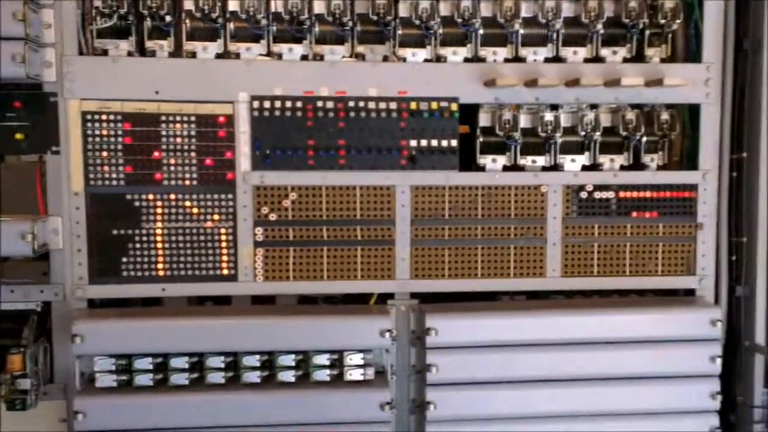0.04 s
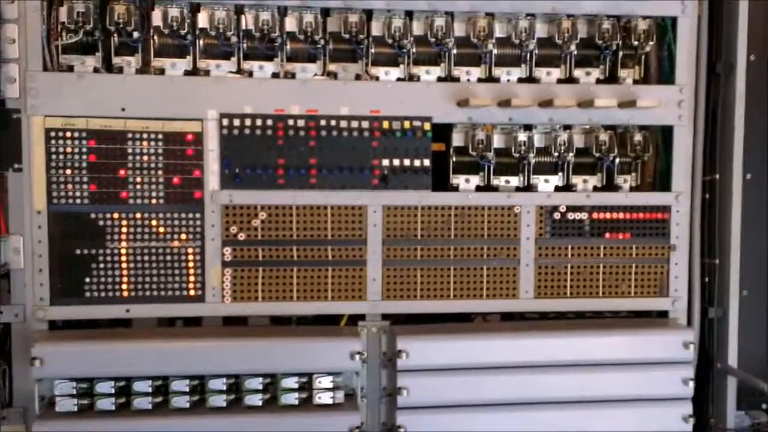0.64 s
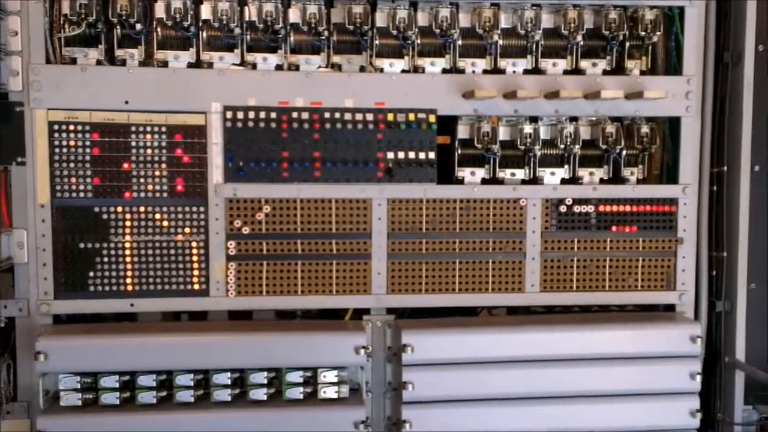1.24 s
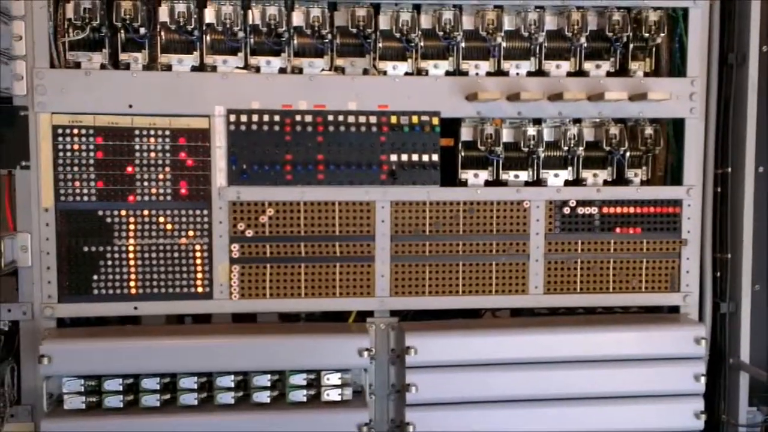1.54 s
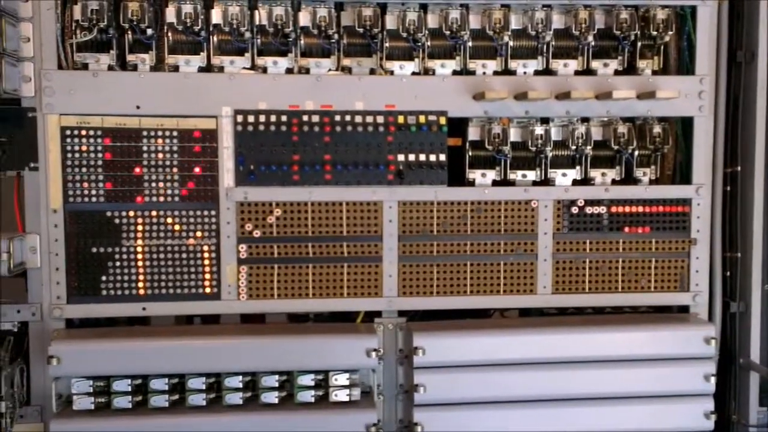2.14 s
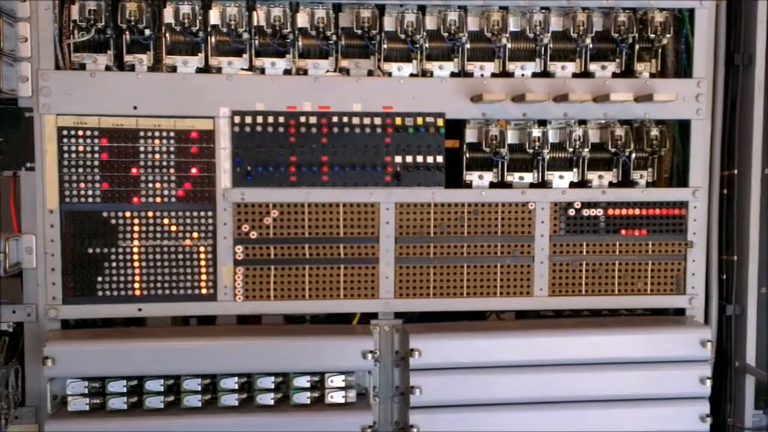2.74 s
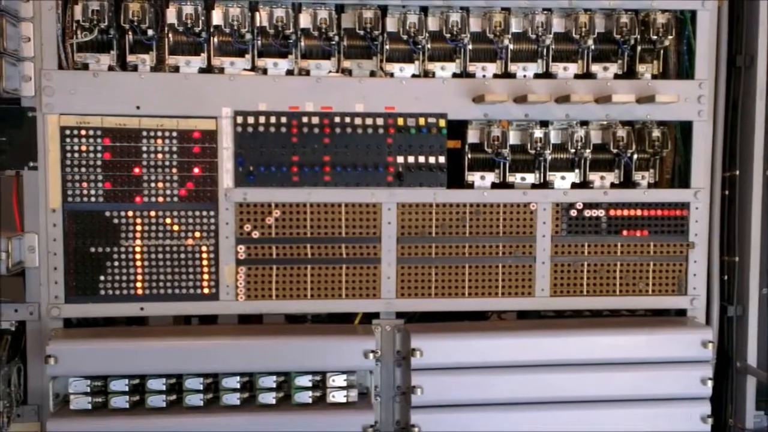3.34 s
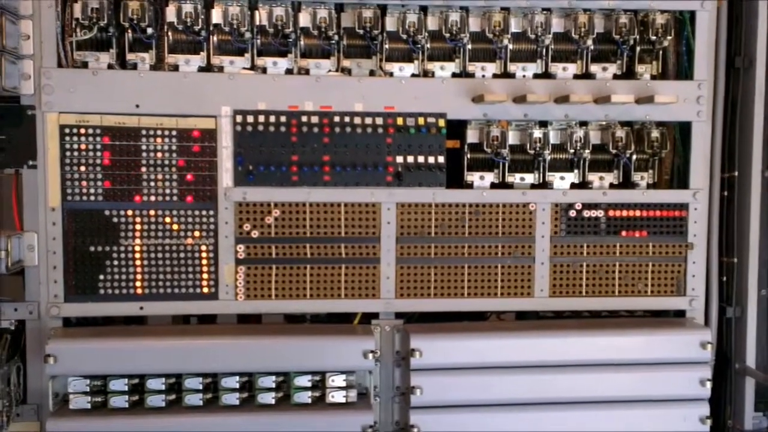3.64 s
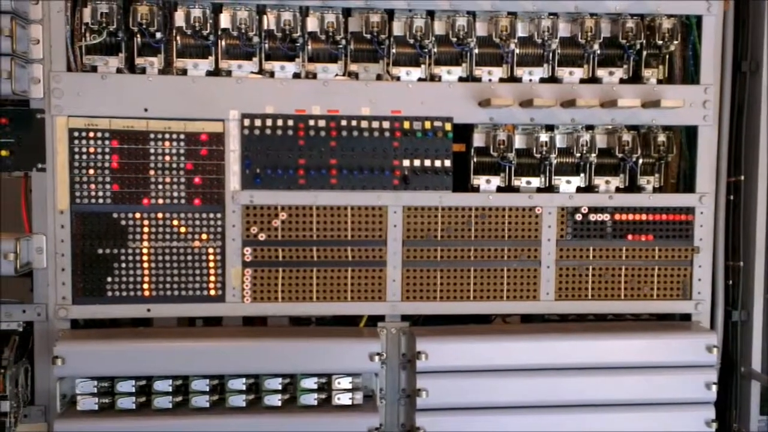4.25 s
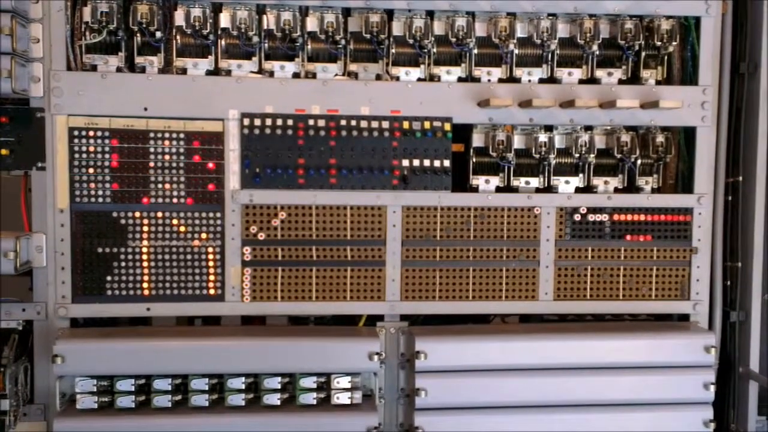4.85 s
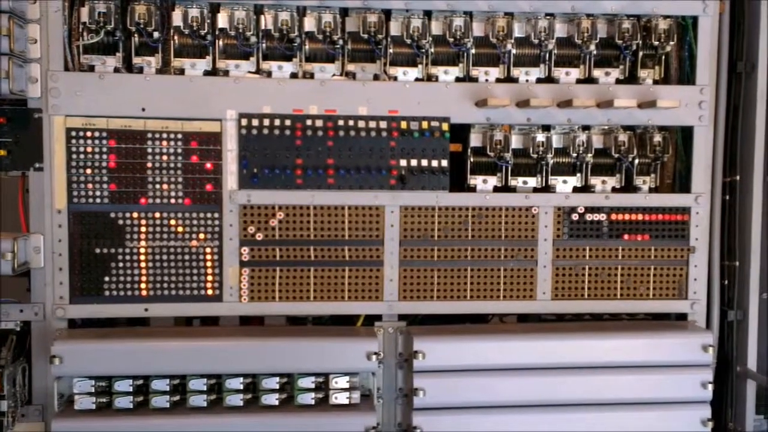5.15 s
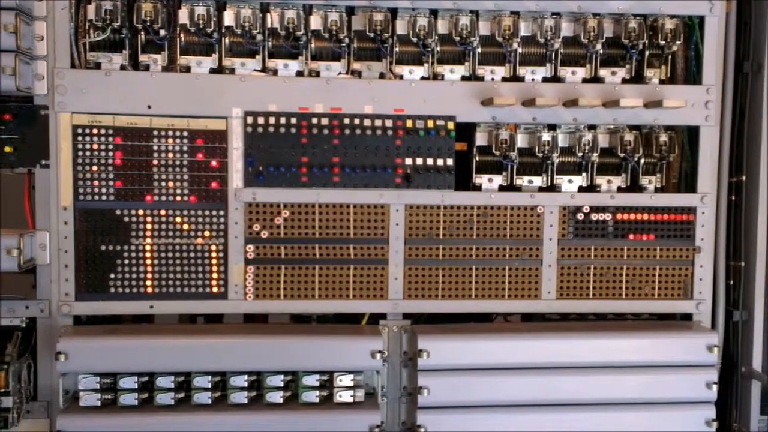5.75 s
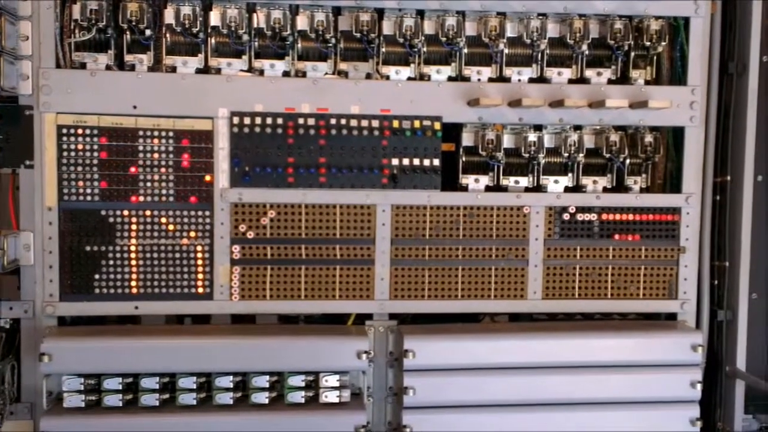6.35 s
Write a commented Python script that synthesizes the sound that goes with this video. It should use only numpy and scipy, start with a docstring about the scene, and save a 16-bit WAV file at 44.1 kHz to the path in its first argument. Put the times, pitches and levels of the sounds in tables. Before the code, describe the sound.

An old electromechanical relay machine runs in a small, hard-walled room, heard from just in front. Its motor and gears whirr and hiss throughout with a faint whine. Five times, evenly spaced, a brief sliding rustle leads into a loud, bright metal clack and a quickly fading clatter of relays. A softer burst of relay clicks comes about half a cycle before each loud stroke.

```python
"""A relay computer's steel latch snaps home once a cycle, amid a clatter of armatures, and rebounds.
A wiper slides ahead of each stroke; half a cycle later a bank of relays switches more softly.
The drive motor whines and its gears and wipers whirr and hiss throughout.
Heard from just in front of the rack, in a hard-walled room."""
import sys
import numpy as np
from scipy import signal
from scipy.fft import rfft, irfft
from scipy.io import wavfile

SR = 44100
rng = np.random.default_rng(int(sys.argv[2]) if len(sys.argv) > 2 else 0)


def inscribe(sig):
    """Save sig as 16-bit PCM at rate SR to the path in sys.argv[1].

    A 1-D sig is mono; a 2-D sig holds one channel per row.
    Samples are clipped to [-1, 1] before scaling.
    """
    pcm = np.round(np.clip(np.atleast_2d(sig).T, -1, 1) * 32767)
    wavfile.write(sys.argv[1], SR, pcm.astype(np.int16))


N = 286650
TIME = np.arange(N) / SR
HZ = np.maximum(np.fft.rfftfreq(N, 1 / SR), 1)
BANK_LEAD_S = .6212  # soft bank ahead of the main stroke
SNAP_RISE_S = .03  # 60 dB rise of the abrupt volleys
LIGHT_CHATTER_S = .0021

# machine cycles: main stroke t/s, armature force/dB, latch blow/dB, latch bounce/dB,
# soft-bank spring snap/dB, rebound delay/s
CYCLES = [(0.7881, 1.5, -5, -6.5, -21, 0.065), (2.1471, 2.5, -6.5, -8, -36, 0.053),
          (3.5066, 2, -5.5, -8.5, -23, 0.07), (4.8646, 2.5, -7, -17, -24, .0695),
          (6.2232, 2, -7, -9.5, -27, 0.058)]
# armature groups: delay/s, level/dB, 60 dB rise/s, 60 dB fall/s, tilt/(dB/oct), spring ring/dB
# rows: soft bank, its slower relays, pull-in, main clatter, rebound, release
VOLLEYS = [(-0.620, -23.5, SNAP_RISE_S, 0.51, 2.4, 7), (-0.597, -31.5, SNAP_RISE_S, 1.0, -.5, 0.5),
           (-0.0047, -21, 0.19, 0.15, 2.4, 0.5), (0.009, -18.5, SNAP_RISE_S, 0.5338, 0.35, 2),
           (0.0677, -22.5, 0.13, 0.4042, 0, 7.5), (0.198, -30, .13, 0.26, -0.5, 3.5)]
# stereo balance of the rack: f/Hz, left-right/dB
RACK_BALANCE = [(700, 0.5), (1300, 3.5), (2400, 1), (4400, -3.5), (6800, -6.5), (9300, 7), (15000, 2.5)]


def from_db(db):
    """Amplitude ratio."""
    return 10 ** (np.asarray(db) / 20)


def unit_rms(x):
    """Scale to rms 1."""
    return x / np.sqrt(np.mean(x ** 2) + 1e-20)


def at_hz(points):
    """Table interpolated over log frequency."""
    hz, value = np.transpose(points)
    return np.interp(np.log(HZ), np.log(hz), value)


def pan(db):
    """Constant-power left and right gains."""
    gains = from_db(np.array([[1], [-1]]) * db / 2)
    return gains / np.sqrt(np.mean(gains ** 2, axis=0))


def colour(x, db):
    """Shape a white signal, keeping its power."""
    return irfft(rfft(x) * unit_rms(from_db(db)), N)


def drift(corner_hz):
    """Slow random variation, rms 1."""
    return unit_rms(irfft(rfft(rng.standard_normal(N)) / (1 + (HZ / corner_hz) ** 2), N))


def resonate(x, hz, width_hz):
    """One resonance, peak gain 1."""
    r = np.exp(-np.pi * width_hz / SR)
    feedback = [1, -2 * r * np.cos(2 * np.pi * hz / SR), r * r]
    return signal.lfilter(np.array([1, 0, -1]) * (1 - r * r) / 2, feedback, x)


def diffuse():
    """White noise from all round: alike at both ears in the bass, less so higher up."""
    # sound field: f/Hz, left-right correlation
    correlation = [(200, 0.9), (700, 0.57), (1400, 0.11), (2100, 0.059), (2700, 0.45), (4200, 0.15),
                   (5400, 0.42), (8000, 0.27), (15000, 0.14)]
    alike = at_hz(correlation)
    mid, side = rfft(rng.standard_normal((2, N)))
    return irfft(np.sqrt(1 + alike) * mid + np.sqrt(1 - alike) * side * [[1], [-1]], N)


def contacts(per_s, spread_db, lag_s):
    """Clicks scattered over the rack, each with its own size and delay between the ears; rms 1."""
    at = np.flatnonzero(rng.random(N) < per_s / SR)
    size, lag = rng.standard_normal((2, N))[:, at]
    at_right = (at + np.round(lag * lag_s * SR).astype(int)) % N
    out = np.zeros((2, N))
    out[0, at] = (-1) ** at * from_db(spread_db * np.clip(size, -2, 2))
    out[1, at_right] = out[0, at]
    return unit_rms(out)


def reflections(x, t60_s):
    """Dense decaying echoes at the power of the input."""
    tail = (diffuse() * from_db(-60 * TIME / t60_s))[:, :SR]
    return signal.fftconvolve(x, unit_rms(tail) / np.sqrt(SR), axes=1)[:, :N]


def motor(shaft_hz=43.48, wander=.00063, waver_db=1.6, swell_db=1.0, rough_db_per_khz=.5):
    """A twelve-segment motor whines with its unsteady shaft; higher overtones are rougher."""
    # whine partials: shaft order (rounded for pitch), level/dB, left-right/dB
    partials = [(12, -71, -36), (24, -50.5, 11.5), (36, -54, 0.3), (48, -55, 21), (60, -52, 4),
                (84.4, -50, -3), (119.7, -53, -3), (121.3, -48.5, 0), (123.4, -58.5, -3), (132, -50, -8),
                (142, -54, -2), (155.4, -51, -5)]
    turns = shaft_hz * np.cumsum(1 + wander * drift(corner_hz=5.8)) / SR
    scrape = drift(corner_hz=70)
    out = 0
    for order, db, side_db in partials:
        khz = order * shaft_hz / 1000
        phase = 2 * np.pi * (round(order) * turns + rng.random() + rng.normal(0, .076, (2, 1)))
        unsteady_db = swell_db * drift(corner_hz=1) + waver_db * drift(corner_hz=37)
        tone = np.sin(phase) * from_db(unsteady_db + rough_db_per_khz * khz * scrape)
        out = out + from_db(db) * pan(side_db) * unit_rms(tone)
    return out


def whirr(level_db=-32.5, flutter_db=1.0, tick_db=-9):
    """Gears and wipers rub and tick, coloured by the panels around them."""
    # running gear spectrum: f/Hz, density/dB
    spectrum = [(150, -37), (270, -17.5), (450, -14), (700, -9), (1200, -6), (1800, -5), (2300, -2),
                (3100, 2), (4400, -3), (6500, -2), (8500, -4), (10200, -6), (12000, -16.5), (16000, -28)]
    # panel and wiper resonances: f/Hz, width/Hz, left lift/dB, right lift/dB
    panels = [(1020, 92, 2, -5), (1415, 210, 5, -2), (1988, 167, 10, 0.5), (2573, 117, 5.5, 4.5),
              (2860, 310, 1, 6.5), (3540, 690, 0, 3), (5285, 130, 3.5, 8.5), (6100, 300, 0.5, 3.5),
              (7050, 1570, -2, 5.5), (9020, 210, 7, 4), (9420, 220, 9, -8.5), (9880, 250, 8.5, -2)]
    lift_db = sum(np.array([[left_db], [right_db]]) / (1 + (2 * (HZ - hz) / width_hz) ** 4)
                  for hz, width_hz, left_db, right_db in panels)
    rubbing = unit_rms(diffuse() + from_db(tick_db) * contacts(per_s=700, spread_db=6, lag_s=.00012))
    flutter = from_db(flutter_db * drift(corner_hz=23))
    return from_db(level_db) * colour(rubbing * flutter, at_hz(spectrum) + lift_db)


def wiper(grain_db=-3, bank_slide_db=-8):
    """A wiper rustles over its contacts before each main stroke and, more faintly, the soft bank."""
    # slide envelope: t from stroke/s, level/dB
    slide = [(-0.26, -65), (-0.205, -36), (-0.14, -29.5), (-0.07, -31), (0.0, -34.5), (0.12, -61.5)]
    # sliding hiss: f/Hz, density/dB
    hiss = [(600, -32.5), (1500, -24), (3000, -2.5), (4800, -2.5), (7000, 1), (9500, 1.5), (11000, -8.5),
            (13000, -13.5), (16000, -27)]
    delay_s, level_db = np.transpose(slide)
    pressure = sum(from_db(db + np.interp(TIME - stroke_s + lead_s, delay_s, level_db))
                   for stroke_s, *_ in CYCLES for lead_s, db in [(0, 0), (BANK_LEAD_S, bank_slide_db)])
    grit = unit_rms(diffuse() + from_db(grain_db) * contacts(per_s=1600, spread_db=11, lag_s=.00014))
    return pressure * colour(grit, at_hz(hiss) + at_hz(RACK_BALANCE) / 2 * [[1], [-1]])


def snaps(blows, modes, alike, soft_hz=11000, size=1024):
    """Steel chatters against its stop and rings. Blows: t/s, level/dB, chatter/s."""
    out = np.zeros((2, N + size))
    age_s = np.arange(size) / SR
    softness = signal.butter(2, soft_hz, fs=SR, output="sos")
    for start_s, level_db, chatter_s in blows:
        grain = rng.standard_normal((3, size))
        chatter = alike * grain[2] + (1 - alike) * grain[:2]  # partly different paths to the ears
        force = signal.sosfilt(softness, chatter / (1 + (age_s / chatter_s) ** 4))
        ring = sum((-1) ** k * from_db(db) * pan(side_db) * resonate(force, hz, width_hz)
                   for k, (hz, width_hz, db, side_db) in enumerate(modes))
        at = round(start_s * SR)
        out[:, at:at + size] += from_db(level_db) * unit_rms(ring) * np.sqrt(chatter_s * SR / size)
    return out[:, :N]


def springs(chatter_s=.0033, bank_chatter_s=.0051, stray_within_s=.04, stray_db=.5, stray_spread_db=3):
    """Contact springs snap at set points of each cycle, plus a random stray in each volley."""
    # spring modes: f/Hz, width/Hz, level/dB, left-right/dB
    modes = [(3000, 1700, -14, -16), (6530, 420, -5, 28), (7180, 210, 3, -3), (7600, 320, 0.5, -20),
             (9100, 1800, -11.5, 1), (12100, 3000, -19, 14)]
    blows = []
    for stroke_s, *_, bank_db, rebound_s in CYCLES:
        blows += [(stroke_s - BANK_LEAD_S, bank_db, bank_chatter_s),
                  (stroke_s + .015, -14, chatter_s),  # jolt after the latch
                  (stroke_s + rebound_s, -14, chatter_s),
                  (stroke_s + rebound_s + .008, -17.5, chatter_s),
                  (stroke_s + .181, -27.5, chatter_s)]  # release
        for delay_s, level_db, *_ in VOLLEYS:
            stray_s = stroke_s + delay_s + stray_within_s * rng.random()
            blows.append((stray_s, level_db + rng.normal(stray_db, stray_spread_db), LIGHT_CHATTER_S))
    return snaps(blows, modes, alike=.44)


def armatures(spring_hz=6700, spring_half_width_hz=900):
    """Volleys of contacts swell and fade, scattered in the rack and ringing in its frame."""
    # armatures on the steel frame: f/Hz, density/dB
    spectrum = [(180, -41), (300, -28.5), (500, -18), (720, -6.5), (1200, -7), (1600, -5.5), (2200, -4),
                (3000, -0.5), (4600, -2.5), (7500, -1), (9400, 0.5), (11000, -8.5), (13000, -17.5),
                (16000, -27)]
    # frame modes: f/Hz, width/Hz, gain/dB
    modes = [(736, 70, -19), (983, 200, 1), (1383, 49, 2), (1593, 153, 3.5), (2770, 29, -5),
             (7360, 140, -10.5)]
    crowd = unit_rms(contacts(per_s=4000, spread_db=4, lag_s=.00014) + diffuse())
    spring_peak = 1 / (1 + ((HZ - spring_hz) / spring_half_width_hz) ** 2)
    bins = 0
    for k, (delay_s, level_db, rise_s, fall_s, tilt_db_per_oct, ring_db) in enumerate(VOLLEYS):
        force = np.zeros(N)
        for stroke_s, force_db, *_ in CYCLES:
            peak_s = stroke_s + delay_s
            span = slice(max(round((peak_s - rise_s) * SR), 0), round((peak_s + fall_s) * SR))
            age_s = TIME[span] - peak_s
            force[span] += from_db(force_db - 60 * np.maximum(-age_s / rise_s, age_s / fall_s))
        own_contacts = np.roll(crowd, k * N // len(VOLLEYS), axis=1)
        tone = unit_rms(from_db(at_hz(spectrum) + tilt_db_per_oct * np.log2(HZ) + ring_db * spring_peak))
        bins = bins + from_db(level_db) * tone * rfft(own_contacts * force)
    clatter = irfft(bins * pan(at_hz(RACK_BALANCE)), N)
    return clatter + sum(from_db(db) * resonate(clatter, hz, width_hz) for hz, width_hz, db in modes)


def latch(touch_lead_s=.0033, touch_db=-12, chatter_s=.004, bounce_s=.0052):
    """Each cycle the steel latch touches its stop, snaps home and bounces once."""
    # latch modes: f/Hz, width/Hz, level/dB, left-right/dB
    modes = [(1376, 120, -17, 9), (3360, 260, -21.5, 0), (6520, 170, -12.5, 9), (7060, 340, -10, -15),
             (7890, 270, -10, 7), (8430, 350, -3.5, 1), (8890, 410, 0, 4.5), (10600, 1200, -16, 15),
             (11420, 840, -16.5, 8), (15000, 2600, -25, -1)]
    blows = []
    for stroke_s, _, blow_db, bounce_db, *_ in CYCLES:
        blows += [(stroke_s - touch_lead_s, touch_db, LIGHT_CHATTER_S),
                  (stroke_s, blow_db, chatter_s),
                  (stroke_s + bounce_s, bounce_db, LIGHT_CHATTER_S)]
    return snaps(blows, modes, alike=.53)


def scene(rack_db=-9, rack_t60_s=.12, room_db=-12, room_t60_s=.23):
    """The machine's blows, reflected by rack and room, over the running drive."""
    blows = armatures() + latch() + springs()
    rack = from_db(rack_db) * reflections(blows, rack_t60_s)
    room = from_db(room_db) * reflections(blows, room_t60_s)
    return blows + rack + room + wiper() + whirr() + motor()


def record(dry, low_cut_hz=230, ceiling=.91, high_cut_hz=15700):
    """The microphone drops the bass, the latch overloads it briefly, the top is cut."""
    low_cut = signal.butter(6, low_cut_hz, "high", fs=SR, output="sos")
    high_cut = signal.ellip(12, .1, 80, high_cut_hz, fs=SR, output="sos")
    clipped = np.clip(signal.sosfilt(low_cut, dry), -ceiling, ceiling)
    return signal.sosfilt(high_cut, clipped)


dry = scene()
out = record(dry)
inscribe(out)
```